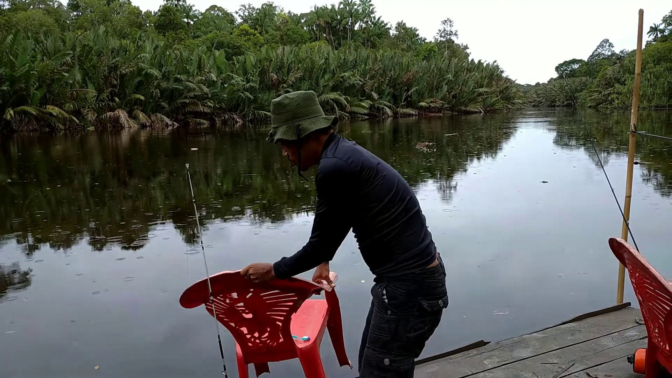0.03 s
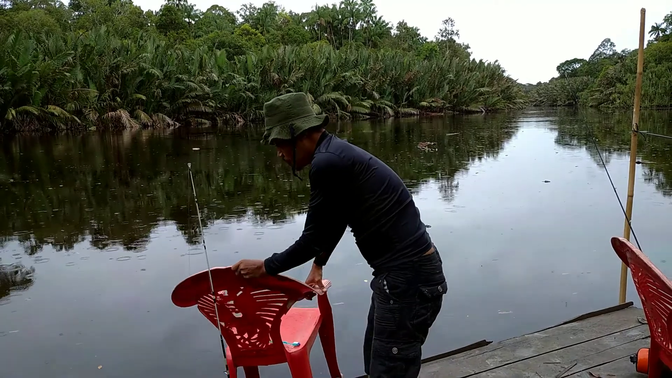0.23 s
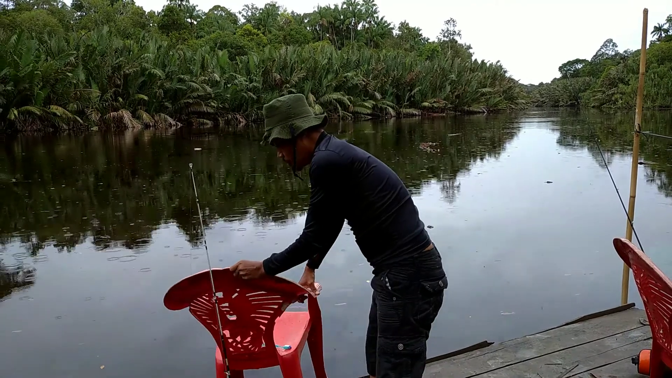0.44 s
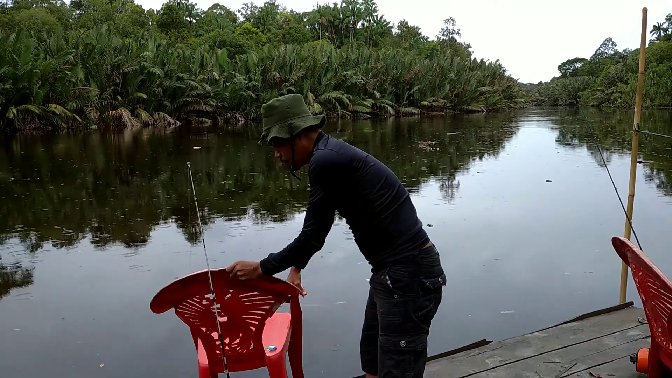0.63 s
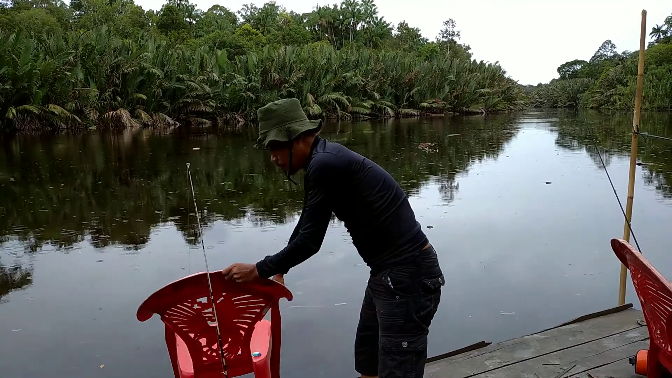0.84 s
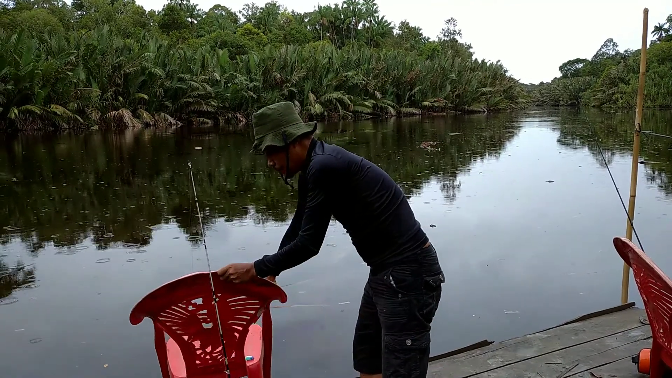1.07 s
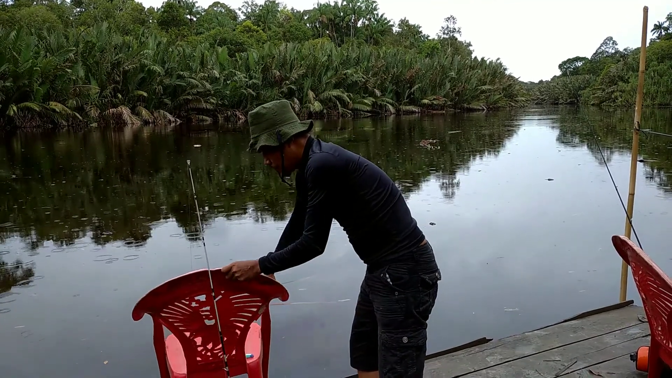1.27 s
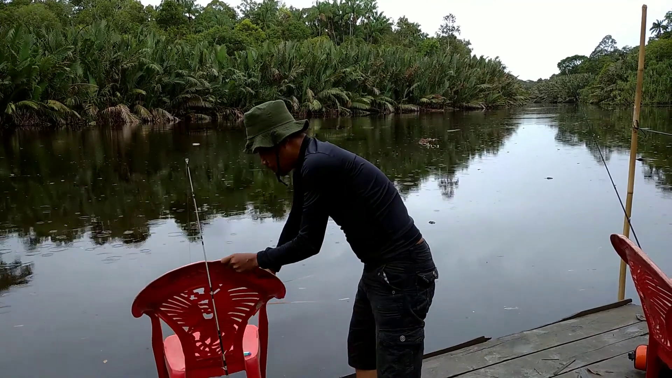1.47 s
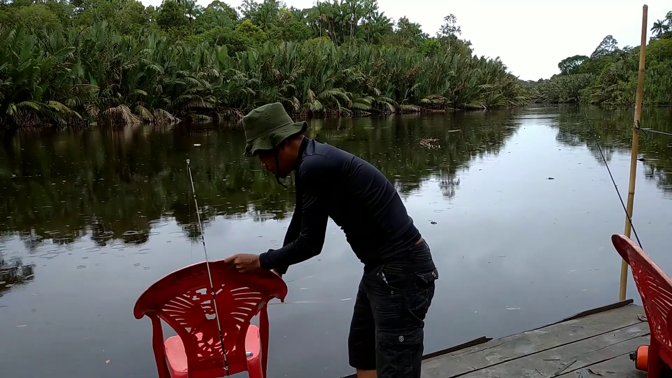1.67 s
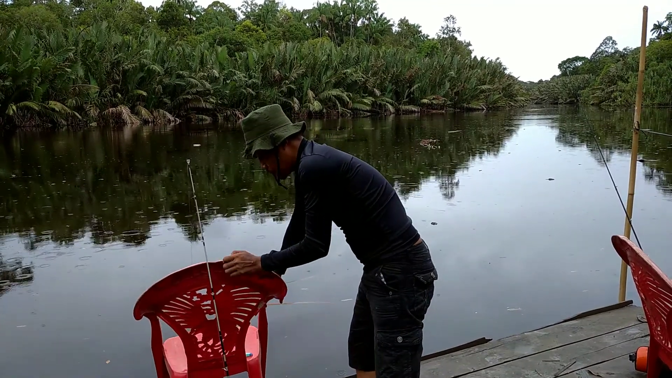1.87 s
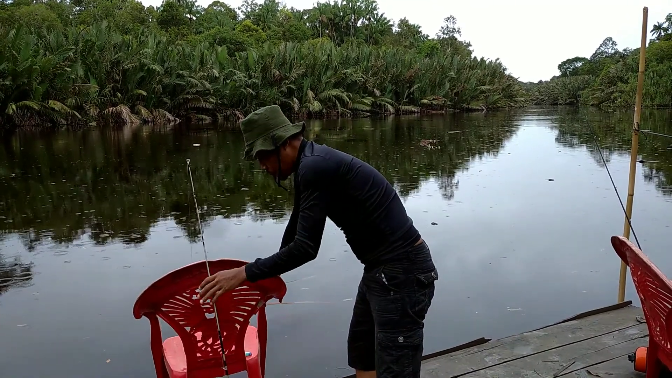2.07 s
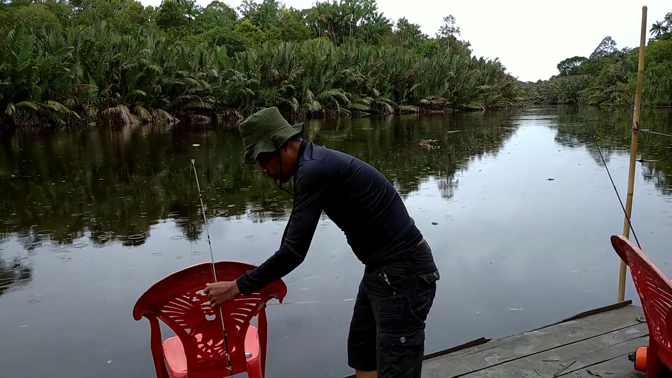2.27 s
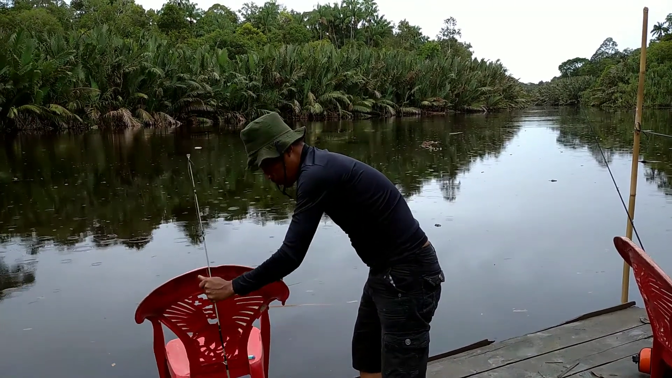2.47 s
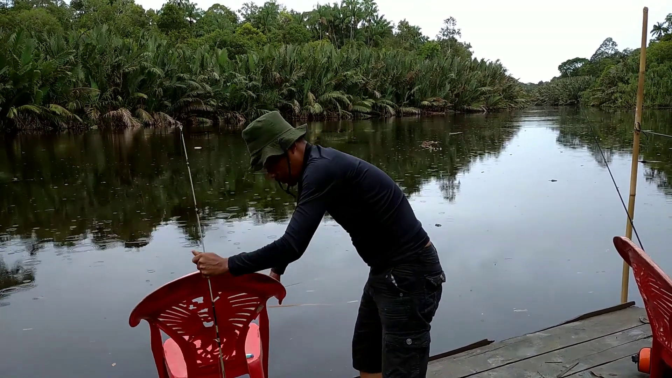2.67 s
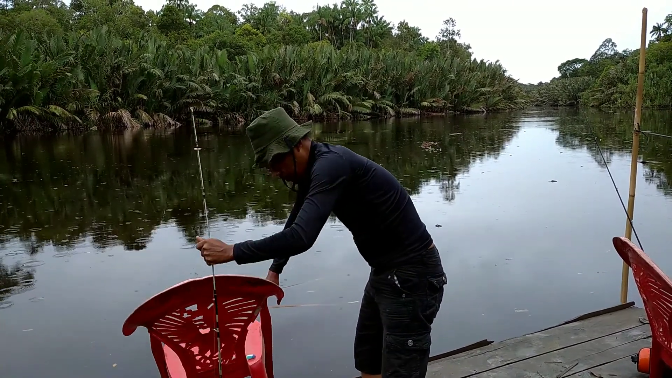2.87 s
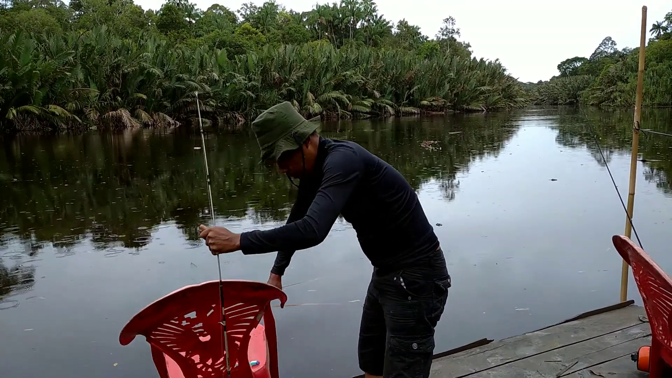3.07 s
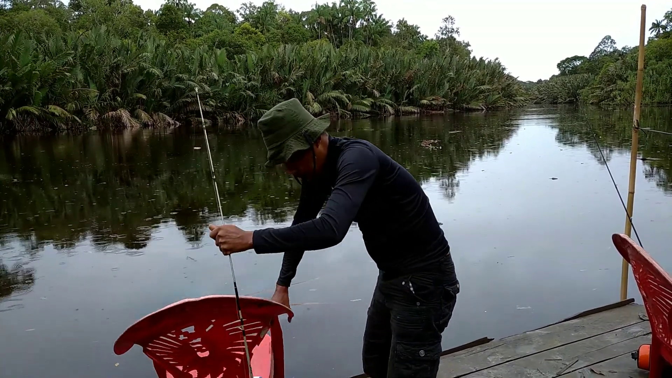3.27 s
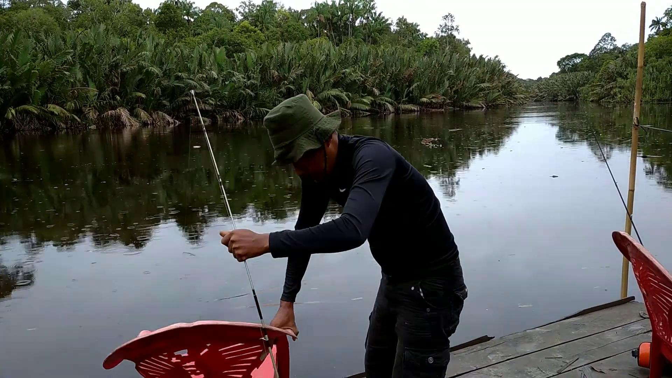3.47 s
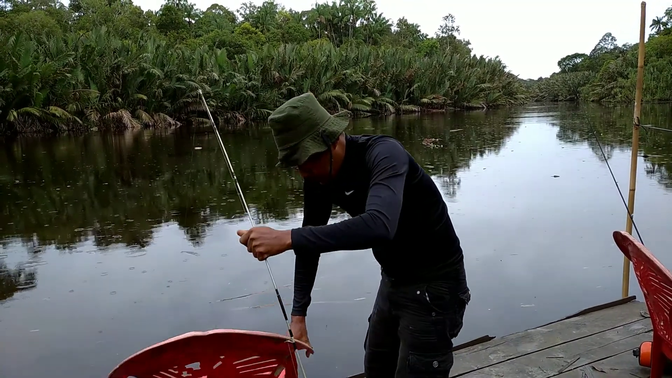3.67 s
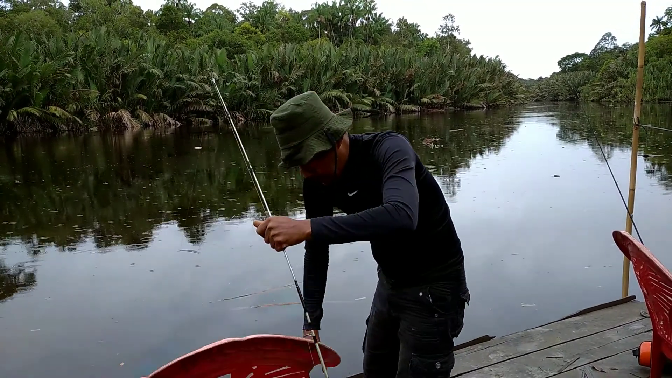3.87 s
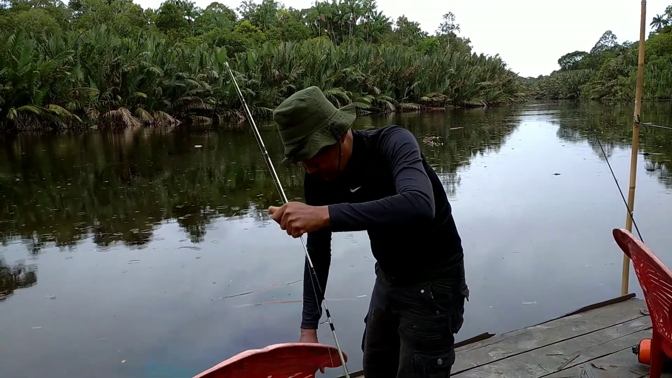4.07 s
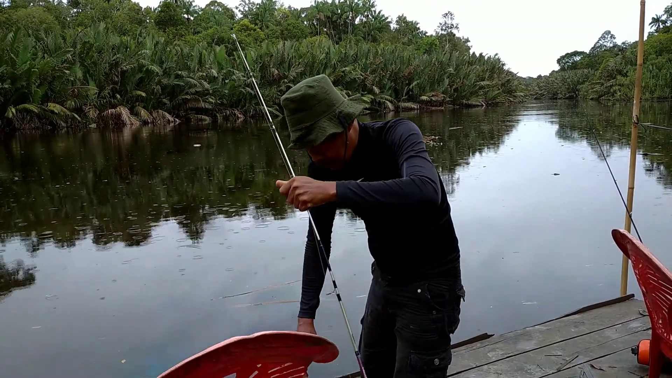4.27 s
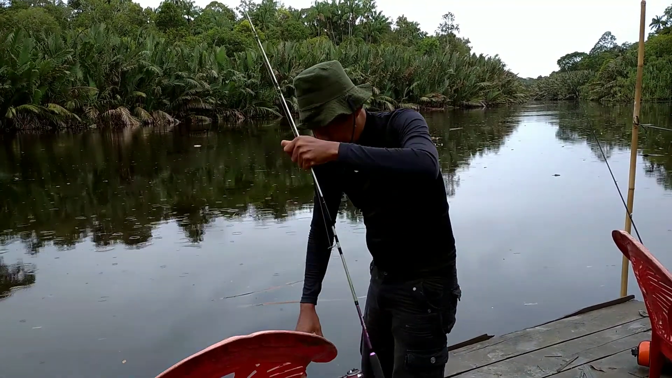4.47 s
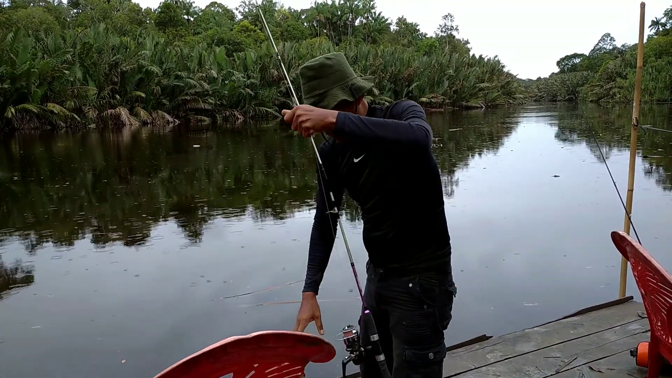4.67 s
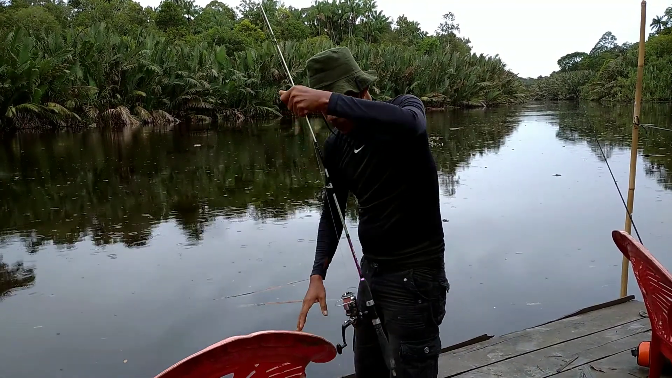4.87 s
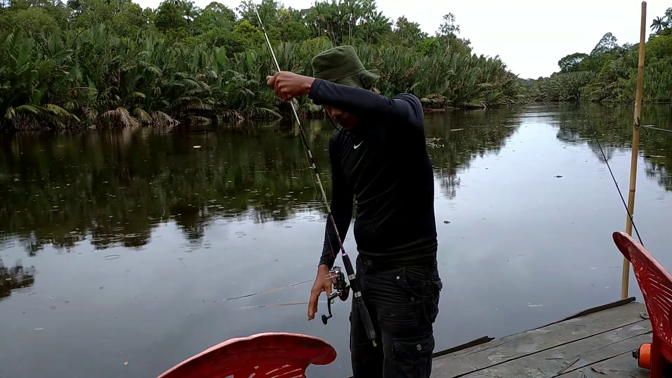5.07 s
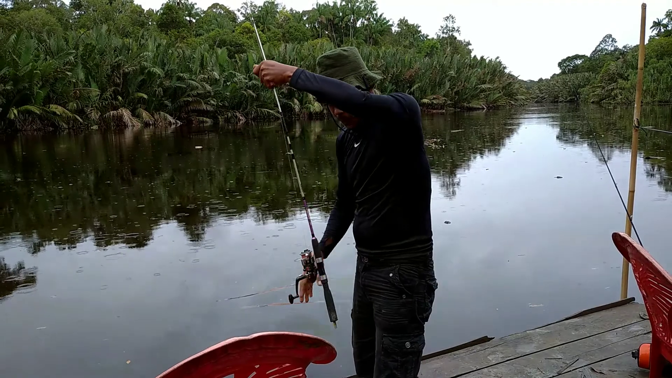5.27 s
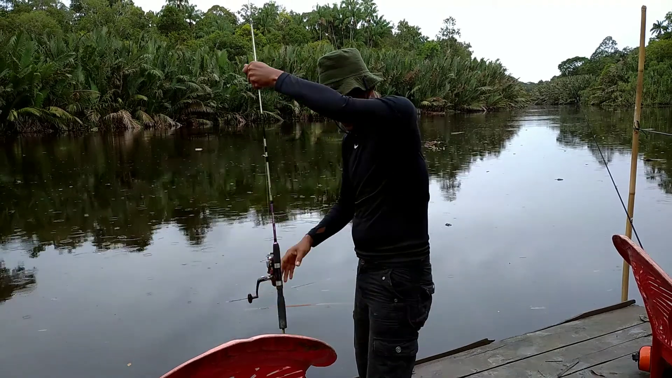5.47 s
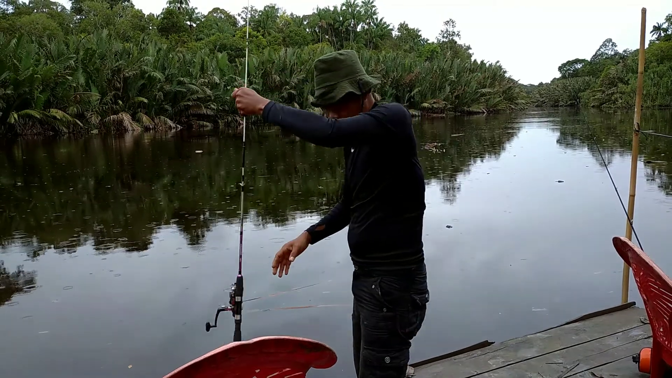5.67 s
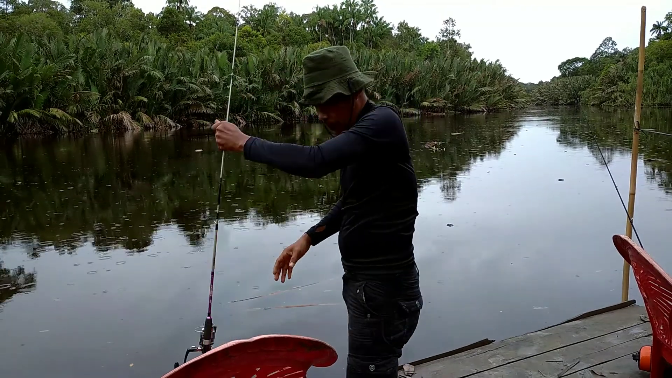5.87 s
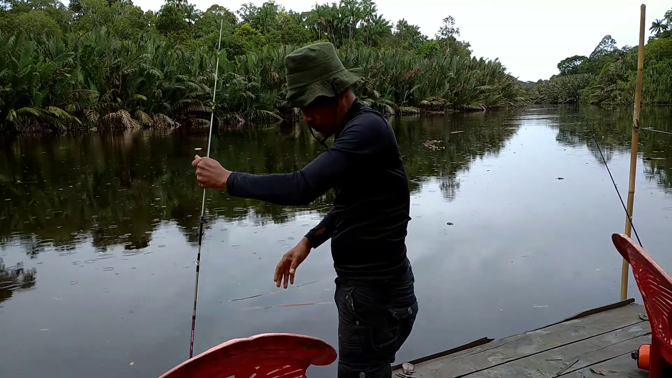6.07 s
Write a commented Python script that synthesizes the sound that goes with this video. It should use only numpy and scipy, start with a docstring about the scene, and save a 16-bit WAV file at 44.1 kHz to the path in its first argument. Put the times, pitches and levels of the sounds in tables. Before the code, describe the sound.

Outdoors by still water, quiet air carries a thin high insect hiss, slightly to the right, with one cricket pulsing about fifteen times a second. Far birds give short clear whistles, mostly in the first 2.5 s, echoing softly off trees. Near the microphone, a plastic chair knocks on planks at 0.2-0.3 s, hollow with a dull thud. Soft rubbing starts at 0.9 s, with small knocks at 1.05-1.35 and a light tap and shove around 1.7-1.9. It is calmer until a brief rub at 2.65. From 2.85 a low groan bends in pitch; a sharp knock and bright rod click come at 3.3. Scraping thickens into harsh stuttering skids from 3.65, with heavy clacks at 3.9 and 4.13, and the hardest landing at 4.36, rattling out by 4.5. Faint plank bumps follow near 4.8 and 5.3, plus a dry tick at 5.35, then a faint rising bird call at 5.65.

```python
"""Chair dragged over a river jetty

A plastic chair is nudged, then dragged over the planks and dropped back on its legs.
Knocks and scrapes sound the boards (thud), the plastic shell (clack) and the gritty contact (tick).
Loose planks bump underfoot, the frame groans and a fishing rod clicks on the chair.
Dying resonances and shaped noise make the blows; streams of uneven slips drive the scrapes.
Around it: still air, a hiss of insects, one pulsing cricket and far birds whistling in the forest."""
import sys
import numpy as np
from scipy import signal
from scipy.fft import rfft, irfft, next_fast_len
from scipy.io import wavfile

SR = 44100
rng = np.random.default_rng(int(sys.argv[2]) if len(sys.argv) > 2 else 0)


def digitize_waveform(pressure):
    """Quantize a signal to 16-bit integers and store it at the path in sys.argv[1].

    Rows of a 2-D input are taken as channels; values are limited to [-1, 1].
    """
    field = np.atleast_2d(pressure).T
    bounded = np.clip(field, -1, 1)
    quanta = np.round(bounded * 32767).astype(np.int16)
    wavfile.write(sys.argv[1], SR, quanta)


N = 269451  # length in samples


def amp(db):
    """Turns decibels into an amplitude factor."""
    return 10 ** (np.asarray(db) / 20)


def unit(x):
    """Scales to rms 1."""
    return x / np.sqrt(np.mean(x ** 2) + 1e-20)


def unit_energy(x):
    """Scales each channel to energy 1."""
    return x / np.linalg.norm(x, axis=-1, keepdims=True)


def read(points, hz):
    """Joins (freq_hz, value) points on a log-frequency axis."""
    point_hz, value = np.transpose(points)
    return np.interp(np.log(hz + 1), np.log(point_hz + 1), value)


def add(mix, start_s, sound):
    """Mixes a sound in at its start time, cut off at the end of the mix."""
    part = mix[..., max(round(start_s * SR), 0):][..., :sound.shape[-1]]
    part += sound[..., :part.shape[-1]]


def noise(spectrum, size):
    """Two unrelated channels of coloured noise."""
    hz = np.fft.rfftfreq(size, 1 / SR)
    white = rfft(rng.standard_normal((2, size)))
    return unit(irfft(white * amp(read(spectrum, hz)), size))


def drift(rate, size):
    """Smooth random wander at rms 1, changing about rate times a second."""
    hz = np.fft.rfftfreq(size, 1 / SR)
    slow = np.exp(-(hz / rate) ** 2) * (hz > 0)
    return unit(irfft(rfft(rng.standard_normal(size)) * slow, size))


def pair(x, likeness, lag_ms):
    """Makes two unrelated channels alike band by band; the left port hears the sound lag_ms later."""
    hz = np.fft.rfftfreq(N, 1 / SR)
    a, b = rfft(x)
    same = np.clip(read(likeness, hz), -1, 1)
    left = a * np.exp(-2j * np.pi * hz * lag_ms / 1000)
    right = same * a + np.sqrt(1 - same ** 2) * b
    return irfft([left, right], N)


def mode(hz, t60, rise_s):
    """One dying resonance, energy 1."""
    t = np.arange(SR // 3) / SR
    wave = np.sin(2 * np.pi * (hz * t + rng.random()))
    return unit_energy(wave * (1 - np.exp(-t / rise_s)) * amp(-60 * t / t60))


def ring(modes, spectrum, dense_db, dense_t60, tail_db, tail_t60, scatter_db):
    """Response to one blow, energy 1: modes weighted by where it lands, a dense crack and a faint tail."""
    t = np.arange(SR // 3) / SR
    fade = amp(-60 * t / dense_t60) + amp(tail_db - 60 * t / tail_t60)
    out = amp(dense_db) * unit_energy(noise(spectrum, len(t)) * fade)
    if len(modes):
        hz, db, t60 = np.transpose(modes)[..., None]
        shape = (2, len(modes), 1)
        weight = amp(db + scatter_db * rng.standard_normal(shape)) * rng.choice([-1, 1], shape)
        tones = weight * amp(-60 * t / t60) * np.sin(2 * np.pi * hz * t)
        out = out + unit_energy(tones.sum(axis=1))
    return unit_energy(out * (1 - np.exp(-t / 0.00033)))  # the contact takes a moment to load


def flex(hz, sink, glide_s, t60):
    """A bending wave in a board: its high part arrives first, so the thud sinks in pitch."""
    t = np.arange(SR // 3) / SR
    pitch_hz = hz * (1 - sink * (1 - np.exp(-t / glide_s)))
    wave = np.sin(2 * np.pi * np.cumsum(pitch_hz) / SR)
    return unit_energy(wave * (1 - np.exp(-t / 0.0057)) * amp(-60 * t / t60))


# colour of the still air and of the insect hiss: freq_hz, relative level_db per Hz
AIR_SPECTRUM = [(15, -50), (25, -17), (48, -15), (61, -9), (76, 0.5), (174, -1), (249, -5.5), (365, -5.5),
                (510, -7), (545, -6.5), (1360, -10.5), (1780, -2), (3110, -7.5), (3400, -10), (5200, -10),
                (6760, -45), (11400, -120)]
INSECT_SPECTRUM = [(4700, -14.5), (5300, -21), (5900, 0.5), (6700, 0), (7600, 0), (8200, -0.5),
                   (8800, -11.5), (10500, -19), (12500, -13.5), (14200, -18.5)]
# likeness of the two microphone ports for distant sound: freq_hz, likeness (-1 to 1)
FAR_LIKENESS = [(60, 0.28), (130, 1), (300, 0.13), (630, 0.53), (1400, -0.35), (3000, 0.12), (14000, -0.59)]


def riverside(air_db=-62.5, insects_db=-63.5, air_waver_db=1.52, insects_waver_db=1.2):
    """Still air over the water and the hiss of many insects, more to the right: wavering shaped noise."""
    air = pair(noise(AIR_SPECTRUM, N), FAR_LIKENESS, lag_ms=0)
    air = air * amp(air_db + air_waver_db * drift(23, N))
    hiss = noise(INSECT_SPECTRUM, N) * amp(insects_db + insects_waver_db * drift(3.4, N))
    return air + hiss * amp([[-1.8], [1.5]])  # left, right


def cricket(pitch_hz=7030, pulses_per_s=14.6, level_db=-71, rough=0.2):
    """One cricket, more to the right, pulses on a narrow, slightly rough note."""
    t = np.arange(N) / SR
    turns = pulses_per_s * t + 0.082 * drift(2.1, N)  # uneven timing
    pulse = np.sin(np.pi * turns) ** 2 * amp(0.76 * drift(5.2, N))
    tone = np.sin(2 * np.pi * np.cumsum(pitch_hz + 22 * drift(190, N)) / SR)
    song = unit(pulse * tone * (1 + rough * drift(150, N)))
    return amp(level_db) * song * amp([[-2], [2]])  # left, right


def note(length_s, middle_hz, start, end, warble, sag_db=0, swell_db=0, flutter_db=4.5):
    """A warbling note: start and end are shares of its middle pitch; it may sag halfway or swell."""
    u = np.linspace(0, 1, round(length_s * SR))
    waver = 1 + warble * drift(120, SR)[:len(u)]
    curve = np.polyfit([0, 0.5, 1], [start, 1, end], 2)
    pitch_hz = middle_hz * np.polyval(curve, u) * waver
    loudness_db = sag_db * np.sin(np.pi * u) ** 6 + swell_db * u
    loudness_db = loudness_db + flutter_db * drift(65, SR)[:len(u)]
    tone = np.sin(2 * np.pi * np.cumsum(pitch_hz) / SR)
    return unit(tone * signal.windows.tukey(len(u), 0.2) * amp(loudness_db))


# one far bird's arched call, loud on the way up and on the way down: start_s, relative level_db
ARCH_CALLS = [(0.02, -67.5), (2.529, -66), (4.73, -63.5)]
# another's phrase of nearly level notes: start_s, length_s, pitch_hz, relative level_db
WHISTLE_NOTES = [(.409, 0.047, 1845, -68), (.645, 0.037, 1815, -65.5), (0.684, 0.03, 2310, -58.5),
                 (0.803, 0.062, 2240, -61.5), (.88, 0.027, 2280, -61), (1.07, 0.086, 2176, -58.5),
                 (1.092, 0.036, 2936, -61.5), (1.2, .05, 1833, -66.5), (1.202, 0.084, 3010, -68.5),
                 (1.257, 0.048, 2290, -63), (1.909, .035, 2600, -71), (2.167, 0.075, 2270, -70.5),
                 (4.58, 0.08, 1196, -68.5)]
# short falling chips: start_s, length_s, middle_pitch_hz, start_pitch (share of middle), relative level_db
FALLING_CHIPS = [(2.039, .045, 3440, 1.14, -64.5), (2.367, 0.058, 2650, 1.07, -61.5),
                 (5.413, 0.039, 4450, 1.04, -70)]
# a fainter, quavering call that only rises: start_s, length_s, middle_pitch_hz, relative level_db
RISING_CALLS = [(5.65, .21, 4280, -71.5)]


def birds(level_db=5.5, direct_db=-8, forest_db=-1.5, forest_t60=0.94):
    """Clear whistles, echoed by the trees on the far bank as a dying noise tail."""
    song = np.zeros(N)
    for start_s, db in ARCH_CALLS:
        call = note(0.11, 4780, start=0.81, end=0.82, warble=0.035, sag_db=-5, swell_db=3)
        add(song, start_s, amp(db + level_db) * call)
    for start_s, length_s, hz, db in WHISTLE_NOTES:
        whistle = note(length_s, hz, start=1, end=0.97, warble=0.021)
        add(song, start_s, amp(db + level_db) * whistle)
    for start_s, length_s, hz, start, db in FALLING_CHIPS:
        chip = note(length_s, hz, start, end=0.97, warble=0.025)
        add(song, start_s, amp(db + level_db) * chip)
    for start_s, length_s, hz, db in RISING_CALLS:
        rise = note(length_s, hz, start=0.88, end=1.07, warble=0.05)
        add(song, start_s, amp(db + level_db) * rise)
    t = np.arange(SR) / SR
    trees = unit_energy(rng.standard_normal((2, SR)) * amp(-60 * t / forest_t60))
    echo = signal.fftconvolve(song[None], trees, axes=1)[:, :N]
    return amp(direct_db) * song + amp(forest_db) * echo


# modes of the boards: freq_hz, relative level_db, t60_s
BOARD_MODES = [(110, -11, 0.13), (129, -9, 0.33), (156, -3, 0.18), (181.5, -2, 0.21), (211.6, -4, 0.24),
               (261, -42, 0.1), (358.2, -4.5, 0.17), (401, -8, 0.11)]
# the dense, quickly damped part of a thud: freq_hz, relative level_db per Hz
THUD_SPECTRUM = [(30, -46), (70, -32), (130, -9.5), (240, 14), (410, -6.5), (520, -2.5), (800, -51)]
# loose planks bumping under the feet: start_s, relative level_db
PLANK_BUMPS = [(0.258, -47), (0.309, -49.5), (.458, -45.5), (0.617, -58.5), (1.327, -44.5), (1.498, -53.5),
               (1.853, -54.5), (2.327, -63.5), (3.448, -41), (3.588, -40), (3.968, -36.5), (4.392, -40),
               (4.794, -59.5), (4.843, -56.5), (5.255, -51), (5.298, -59.5)]


def planks(level_db=29, ring_db=-7, pitch_hz=190, pitch_spread=0.16, rebound_s=0.0169, rebound_db=-6.5):
    """Shifting weight bumps loose planks, which drop back once on their beams: dull thumps, no clack."""
    out = np.zeros((2, N))
    for start_s, db in PLANK_BUMPS:
        for delay_s, change_db in ((0, 0), (rebound_s, rebound_db)):
            hz = pitch_hz * np.exp(pitch_spread * rng.standard_normal())
            boards = ring(BOARD_MODES, THUD_SPECTRUM, dense_db=0.5, dense_t60=0.028,
                          tail_db=-33, tail_t60=0.092, scatter_db=7)
            thump = flex(hz, sink=0.27, glide_s=0.0065, t60=0.034) + amp(ring_db) * boards
            add(out, start_s + delay_s, amp(db + change_db + level_db) * thump)
    return out


# the dense part of a gritty tick or snap: freq_hz, relative level_db per Hz
TICK_SPECTRUM = [(1500, 0.5), (2500, 5), (3300, 1), (4600, 0.5), (4950, 3), (5800, -12.5), (7000, -10),
                 (8700, -5), (9600, -10.5), (10400, -17.5), (14000, -27.5)]
# modes of the fishing rod when it clicks on the chair: freq_hz, relative level_db, t60_s
ROD_MODES = [(4070, 2, 0.038), (4420, 1, 0.032), (4760, 7, 0.048), (9060, 3, 0.017), (9900, -8, 0.0096),
             (11300, -2, 0.013), (13200, -6, .012)]
# the rod or its reel clicking on the chair: start_s, ring_db, snap_db
ROD_CLICKS = [(1.69, -43, -50), (3.3124, -9, -13), (5.347, -49, -31.5)]


def rod():
    """Each click mixes a dry noise snap with the ringing modes of the rod."""
    out = np.zeros((2, N))
    for start_s, ring_db, snap_db in ROD_CLICKS:
        tone = ring(ROD_MODES, TICK_SPECTRUM, dense_db=-29, dense_t60=0.019,
                    tail_db=-25, tail_t60=0.06, scatter_db=1)
        snap = ring([], TICK_SPECTRUM, dense_db=0, dense_t60=0.01, tail_db=-3, tail_t60=0.11, scatter_db=0)
        add(out, start_s, amp(ring_db) * tone + amp(snap_db) * snap)
    return out


def slips(size, per_s, jitter, spread_db, hiss):
    """Stick and slip: a chatter of jerks, uneven in pace and size, over a fine grinding."""
    pace = per_s * np.exp(jitter * drift(120, size + SR // 8)[:size])
    turns = np.cumsum(pace) / SR + rng.random()
    jerk = np.diff(np.floor(turns), prepend=-1) > 0  # one jerk each time a turn completes
    strength = amp(spread_db * np.clip(rng.standard_normal(size), -2, 2))
    return unit(unit(jerk * strength) + hiss * rng.standard_normal(size))


# the frame's groan, its pitch shifting as it bends: time_s, pitch_hz, relative level_db
GROAN_PATH = [(2.84, 288, -63), (2.955, 300, -48), (3.01, 340, -60), (3.07, 332, -51.5), (3.17, 350, -47),
              (3.225, 313, -56), (3.29, 260, -46.5), (3.38, 298, -54)]


def groan(level_db=-0.5, width_hz=89):
    """Fine slips feed one low resonance of the frame, which moves as the chair bends."""
    time_s, hz, db = np.transpose(GROAN_PATH)
    t = np.arange(time_s[0], time_s[-1], 1 / SR)
    turn = np.exp(2j * np.pi * np.cumsum(np.interp(t, time_s, hz)) / SR)
    drive = slips(len(t), per_s=590, jitter=0.55, spread_db=4, hiss=0.9)
    # shifting down, smoothing and shifting back up makes a moving band filter
    smooth = signal.butter(2, width_hz / 2, fs=SR, output="sos")
    tone = unit((turn * signal.sosfilt(smooth, drive / turn)).real)
    out = np.zeros((2, N))
    add(out, time_s[0], amp(np.interp(t, time_s, db) + level_db) * tone)
    return out


# modes of the chair's legs and seat: freq_hz, relative level_db, t60_s
FRAME_MODES = [(249.5, 5.5, 0.044), (299, -8.5, 0.26), (343, 1, 0.15), (414, 0.5, 0.041), (540, -37, 0.11)]
# modes of the plastic shell: freq_hz, relative level_db, t60_s
SHELL_MODES = [(554, 0.5, 0.049), (694, 0, 0.062), (810, -4.5, 0.067), (876, -8.5, 0.03), (1056, -3, 0.051),
               (1137, 1, 0.039), (1260, -1.5, 0.018), (1410, -33, 0.037), (1480, -3, 0.045),
               (1600, -21, 0.19), (1920, -37, 0.074), (2047, -4.5, 0.13), (2264, 1, 0.056),
               (2350, 4, 0.049)]
# the dense, quickly damped part of a clack: freq_hz, relative level_db per Hz
CLACK_SPECTRUM = [(300, -44), (520, -0.5), (800, -2.5), (1120, -1), (1400, -12.5), (2000, -3.5),
                  (2500, -21.5), (3200, -30.5), (5000, -60)]


def friction(drive, boards, frame, shell, grit, shell_top_hz):
    """A leg's contact drives four voices by the given gains; a soft one misses the shell's high modes."""
    board_voice = ring(BOARD_MODES, THUD_SPECTRUM, dense_db=-0.5, dense_t60=0.025,
                       tail_db=-65, tail_t60=0.23, scatter_db=5.5)
    frame_voice = ring(FRAME_MODES, THUD_SPECTRUM, dense_db=2, dense_t60=0.028,
                       tail_db=-6, tail_t60=0.17, scatter_db=2.5)
    shell_voice = ring(SHELL_MODES, CLACK_SPECTRUM, dense_db=-3, dense_t60=0.013,
                       tail_db=-10, tail_t60=0.026, scatter_db=0.5)
    soften = signal.butter(4, shell_top_hz, fs=SR, output="sos")
    shell_voice = signal.sosfilt(soften, shell_voice)
    grit_voice = ring([], TICK_SPECTRUM, dense_db=0, dense_t60=0.012,
                      tail_db=-11, tail_t60=0.14, scatter_db=0)
    drive = drive - drive.mean()
    voices = ((boards, board_voice), (frame, frame_voice), (shell, shell_voice), (grit, grit_voice))
    return sum(signal.fftconvolve((drive * gain)[None], voice, axes=1) for gain, voice in voices)


def rub(pressure, load_db, boards_db=-2, frame_db=-4, shell_db=-9, grit_db=-13):
    """The lightly loaded legs slide on, their pressure wavering with the grain of the wood."""
    size = len(pressure)
    drive = slips(size, per_s=650, jitter=0.4, spread_db=2.5, hiss=0.3)
    drive = drive * pressure * amp(1.5 * drift(24, size))
    # the weight shifts between two legs, each with its own colour
    lean = drift(6.04, next_fast_len(size + SR))[:size]
    return sum(friction(drive * share, amp(load_db + boards_db), amp(frame_db), amp(shell_db),
                        amp(grit_db), shell_top_hz=1530)
               for share in (np.cos(lean), np.sin(lean)))


# small shoves of the chair: start_s, hardest_s, end_s, pressure_db
SHOVES = [(.865, 0.881, 1.56, -48), (1.689, 1.78, 1.93, -53), (2.649, 2.703, 2.84, -50)]
# the long drag: time_s, relative pressure_db on the legs, relative load_db on the boards
DRAG_PATH = [(2.85, -66, -61), (2.944, -66.5, -66), (3.074, -60, -74), (3.21, -62, -62),
             (3.412, -64.5, -55.5), (3.66, -58.5, -47), (3.775, -60, -51), (3.82, -49, -48),
             (3.986, -58, -60), (4.15, -55.5, -51), (4.323, -71, -78), (4.373, -43.5, -67),
             (4.53, -71, -60), (4.58, -70, -78)]


def rubbing(nudge_fade_db=-11.5, nudge_load_db=0.5, drag_db=15, drag_load_db=6.5):
    """A few shoves that build up and ease off, and the long drag: legs rubbing under varying pressure."""
    out = np.zeros((2, N))
    for start_s, hardest_s, end_s, db in SHOVES:
        t = np.arange(start_s, end_s, 1 / SR)
        build_up = np.interp(t, [start_s, hardest_s], [0, 1])
        fade_db = np.interp(t, [hardest_s, end_s], [0, nudge_fade_db])
        add(out, start_s, rub(build_up * amp(db + fade_db), nudge_load_db))
    time_s, pressure_db, load_db = np.transpose(DRAG_PATH)
    t = np.arange(time_s[0], time_s[-1], 1 / SR)
    pressure_db = np.interp(t, time_s, pressure_db) + drag_db
    load_db = np.interp(t, time_s, load_db) + drag_load_db
    add(out, time_s[0], rub(amp(pressure_db), load_db - pressure_db))
    return out


# resonances of a leg's tip: pitch_ratio (multiple of its pitch), relative level_db
TIP_MODES = [(1, -0.5), (1.45, -8.5), (1.93, -11)]


def tip(drive, hz, width_hz=110, sag_per_s=2.5, detune=0.02):
    """The leg's tip rings in a few short resonances that sink as it bends."""
    drive = np.pad(drive, (0, SR // 10))
    t = np.arange(len(drive)) / SR
    turns = np.cumsum(hz * np.exp(-sag_per_s * t)) / SR
    r, out = np.exp(-np.pi * width_hz / SR), 0  # r: decay per sample
    for ratio, db in TIP_MODES:
        detuned = ratio * (1 + detune * rng.standard_normal())
        turn = np.exp(2j * np.pi * detuned * turns)
        rung = turn * signal.lfilter([np.sqrt(2 * (1 - r * r))], [1, -r], drive / turn)
        out = out + amp(db) * rng.choice([-1, 1], (2, 1)) * rung.imag
    return out


# a leg skids, or ticks and clatters briefly: start_s, length_s, relative strength_db,
# relative load_db on the boards, swell_db reached at its end, tip_pitch_hz at its start, relative grit_db
SCRAPES_AND_TICKS = [(0.247, 0.0042, -48.5, -12, -6, 1560, 3.5), (0.266, 0.0096, -54.5, -4, -2, 1270, 3),
                     (1.326, 0.0053, -47.5, 1, -9, 1515, -9), (1.335, .005, -50.5, -10, -3, 990, -7),
                     (3.219, .014, -48, 0.5, 1, 1012, -17), (3.252, 0.06, -45, -3, -2, 960, -7.5),
                     (3.333, .02, -42.5, 10.5, -9, 960, 3.5), (3.466, 0.015, -54, -4, -3, 1421, 4.5),
                     (3.506, .02, -49, 4, -0.5, 1110, -2.5), (3.526, 0.013, -50, 8.5, 1, 1180, 1.5),
                     (3.585, 0.053, -47.5, 1, -3, 1060, 0.5), (3.644, 0.019, -43.5, -0.5, -4, 1110, -7),
                     (3.669, 0.019, -37.5, -8.5, -6, 1040, -6), (3.71, 0.02, -38, -17, -2.5, 1150, -1),
                     (3.738, .02, -37, -15, -8, 1096, 3), (3.788, .012, -36, -13, 2, 1155, 1),
                     (3.799, 0.013, -32.5, 0, 1.5, 1840, -15), (3.809, 0.0092, -35.5, -6, 6.5, 1550, 2),
                     (3.824, 0.015, -31, -12, -2.5, 1116, -5.5), (3.848, 0.0063, -29, -8, -2.5, 1080, -3.5),
                     (3.856, .015, -35, -5, 2.5, 1290, 2), (3.889, 0.028, -40.5, 3.5, -2, 1090, 7.5),
                     (3.982, 0.019, -48.5, -4, -5, 1320, 4), (4.05, .025, -56.5, 14, 1.5, 1390, 2),
                     (4.127, 0.0036, -35.5, -7, 5, 1430, -7), (4.245, .014, -57, 0, 1.5, 766, 0),
                     (4.278, 0.023, -56.5, -18, 1.5, 1960, 2.5), (4.309, 0.0026, -50, -18, -6, 1940, 3),
                     (4.381, 0.038, -49.5, 14.5, -4.5, 1850, 9.5), (4.414, .012, -47, 12, -2, 1520, 9),
                     (4.437, 0.06, -48, 12, -17, 1700, 8)]


def scrapes_and_ticks(thud_db=-1, frame_db=-8, clack_db=-5, tip_db=-1.5, tick_db=-1, first_jerk=4.1):
    """Short harsh scrapes and ticks: a jerk, then a dry chatter of uneven slips that swells or eases off."""
    out = np.zeros((2, N))
    for start_s, length_s, strength_db, load_db, swell_db, tip_hz, grit_db in SCRAPES_AND_TICKS:
        t = np.arange(round(length_s * SR)) / SR
        drive = slips(len(t), per_s=600, jitter=0.4, spread_db=3.2, hiss=0.1)
        drive[0] += first_jerk
        drive = drive * amp(strength_db + swell_db * t / t[-1])
        contact = friction(drive, amp(load_db + thud_db), amp(load_db + frame_db), amp(clack_db),
                           amp(tick_db + grit_db), shell_top_hz=6000)
        add(out, start_s, contact)
        add(out, start_s, amp(tip_db) * tip(drive, tip_hz))
    return out


# the touches within one landing: time_share (of the contact time), relative level_db
LANDING_TOUCHES = [(0, -7), (0.449, -3), (1, -6.5)]


def clatter(note_hz, contact_s, clack_db=27, note_db=27, overtone=1.838, overtone_db=-5, tick_db=19,
            detune=0.1, note_t60=0.016):
    """A leg rocks onto the wood in quick touches; each rings the hollow shell at a slightly different note."""
    out = np.zeros((2, SR // 3))
    for share, db in LANDING_TOUCHES:
        hz = note_hz * np.exp(detune * rng.standard_normal())
        shell = ring(SHELL_MODES, CLACK_SPECTRUM, dense_db=6.5, dense_t60=0.017,
                     tail_db=-17, tail_t60=0.28, scatter_db=6)
        hollow = mode(hz, note_t60, rise_s=0.0009)
        hollow = hollow + amp(overtone_db) * mode(hz * overtone, note_t60, rise_s=0.0006)
        tick = ring([], TICK_SPECTRUM, dense_db=0, dense_t60=0.06, tail_db=-18, tail_t60=0.14, scatter_db=0)
        touch = amp(clack_db) * shell + amp(note_db) * hollow + amp(tick_db) * tick
        add(out, share * contact_s, amp(db) * touch)
    return out


# chair legs landing on the boards: start_s, relative force_db, relative hardness_db, thud_start_pitch_hz,
# bounce_gap_s (sets the spacing of the bounces), loss_db per bounce, relative frame_ring_db,
# shell_note_hz (before detuning), contact_s
LEG_LANDINGS = [(.229, -39.5, -16, 221, .023, 7, -21, 954, 0.0023),
                (0.293, -49, -11.5, 292, 0.012, 5, -19, 820, 0.0019),
                (1.057, -46, 0.5, 247, .012, 7, -16, 886, 0.0049),
                (1.185, -55, -3, 257, 0.024, 2.5, -6.5, 1070, 0.0023),
                (1.309, -38, -13, 293, .018, 13, -20, 880, 0.0032),
                (1.363, -57, 3, 302, 0.019, 5, -13, 780, 0.0041),
                (1.794, -49.5, -8, 279, 0.035, 8, -13, 886, 0.0027),
                (3.058, -54, -8, 407, 0.043, 20, 4.5, 1100, .005),
                (3.312, -35.5, -6.5, 463, .03, 10, -3, 964, 0.0038),
                (3.403, -44, -3.5, 350, .013, 21, 0.5, 890, 0.0032),
                (3.418, -56.5, 6.5, 300, 0.014, 18, -20, 1560, 0.0017),
                (3.579, -60.5, 10.5, 276, .012, 19, -8, 1090, 0.0044),
                (3.886, -32.5, -3, 343.4, .015, 26, 0.5, 1150, 0.0042),
                (3.896, -30, 0, 434, .012, 10, 5.5, 1084, .004),
                (3.953, -36, 0, 334, .016, 10.5, -11, 1040, .005),
                (4.1303, -38, 6, 460, 0.0085, 13, 1, 804, 0.0066),
                (4.363, -28, -3.5, 249, 0.009, 13, -4.5, 1097, .002),
                (4.389, -42.5, 1.5, 294, 0.0072, 14, -8, 1020, 0.0064),
                (4.406, -38, -9, 257, .012, 5.5, -4.5, 910, 0.0029),
                (4.439, -38, -11.5, 264, .012, 12, -4, 950, 0.0033),
                (4.475, -43.5, -22, 248, 0.028, 6.5, -16, 990, .003)]


def knocks(thud_db=27, frame_db=28, flex_db=1, count=4, bounce_shrink=0.69, bounce_jitter_s=0.001516):
    """Every blow flexes a board, rings the frame and clatters in the shell; weaker bounces follow."""
    out, t = np.zeros((2, N)), np.arange(SR // 3) / SR
    for start_s, force_db, hardness_db, hz, gap_s, loss_db, ring_db, note_hz, contact_s in LEG_LANDINGS:
        boards = ring(BOARD_MODES, THUD_SPECTRUM, dense_db=1.5, dense_t60=0.071,
                      tail_db=-32, tail_t60=0.12, scatter_db=0)
        thud = amp(thud_db) * (boards + amp(flex_db) * flex(hz, sink=0.39, glide_s=0.013, t60=0.04))
        frame = amp(frame_db + ring_db) * mode(395, t60=0.061, rise_s=0.00061)  # same pitch for every leg
        body = (thud + frame) * (1 - np.exp(-t / 0.00033))  # soft onset
        blow = body + amp(hardness_db) * clatter(note_hz, contact_s)
        hit_s = start_s
        for bounce in range(count):
            add(out, hit_s, amp(force_db - bounce * loss_db) * blow)
            # the gaps shrink, a little unevenly
            hit_s += gap_s * bounce_shrink ** bounce + bounce_jitter_s * rng.uniform(-1.1, 1)
    return out


# likeness of the two microphone ports for the chair close by: freq_hz, likeness (-1 to 1)
NEAR_LIKENESS = [(60, 1), (450, 0.99), (1100, 0.99), (2000, 0.75), (4000, 0.18), (12000, 0.069)]


def scene(low_cut_hz=118):
    """The chair close by, too small to radiate deep bass, and the river all round."""
    near = planks() + rod() + groan() + rubbing() + scrapes_and_ticks() + knocks()
    near = pair(near, NEAR_LIKENESS, lag_ms=0.15)
    near = signal.sosfilt(signal.butter(3, low_cut_hz, "high", fs=SR, output="sos"), near)
    return riverside() + cricket() + birds() + near


# balance of the ports, the right one weak in the bass: freq_hz, left_minus_right_db
PORT_BALANCE = [(40, 7), (110, 15), (220, 14), (370, 15), (520, -0.5), (700, -0.5), (1200, 2.5), (2300, 0),
                (4300, -1), (9000, 2)]


def record(dry, dip_hz=5026, dip_width_hz=240, dip_db=-10, edge_hz=14350):
    """Unequal microphone ports with a narrow dip near 5 kHz, then the upper band limit."""
    hz = np.fft.rfftfreq(N, 1 / SR)
    ratio = amp(read(PORT_BALANCE, hz))
    ports = np.array([2 * ratio, np.full_like(ratio, 2)]) / (1 + ratio)  # the two gains sum to 2
    dip = amp(dip_db * np.exp(-((hz - dip_hz) / dip_width_hz) ** 2))
    heard = irfft(rfft(dry) * dip * ports, N)
    band_limit = signal.firwin(401, edge_hz, window=("kaiser", 8), fs=SR)
    return signal.oaconvolve(heard, band_limit[None], "same")


dry = scene()
out = record(dry)
digitize_waveform(out)
```